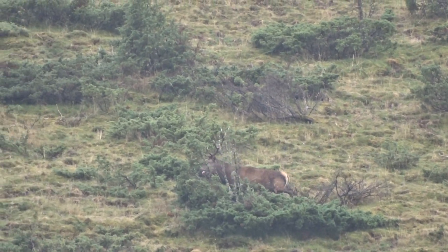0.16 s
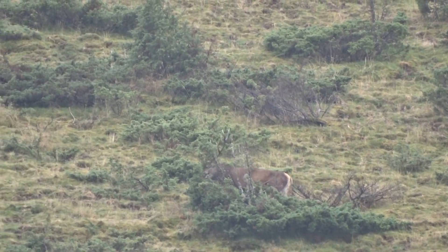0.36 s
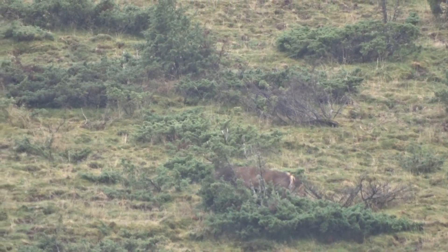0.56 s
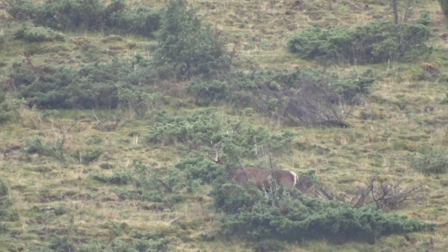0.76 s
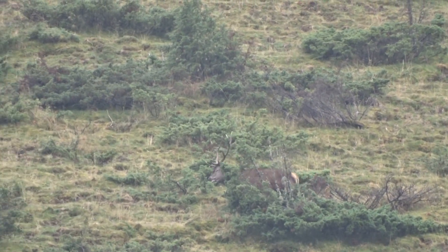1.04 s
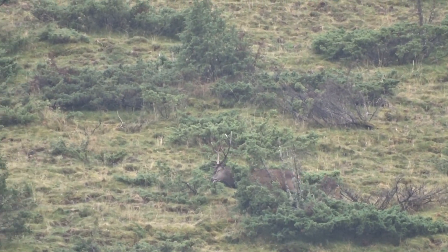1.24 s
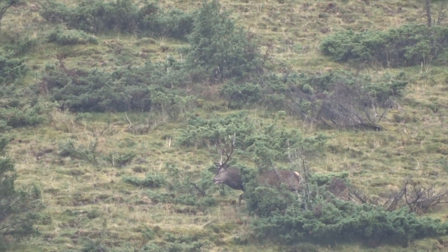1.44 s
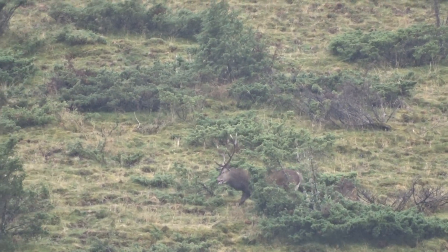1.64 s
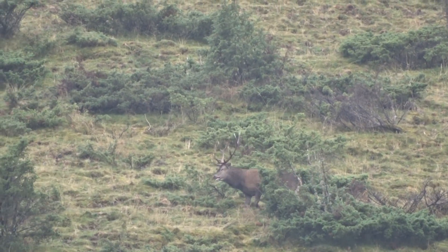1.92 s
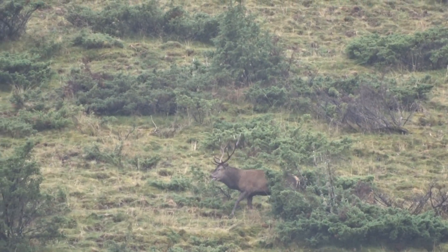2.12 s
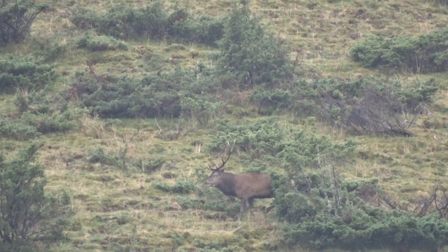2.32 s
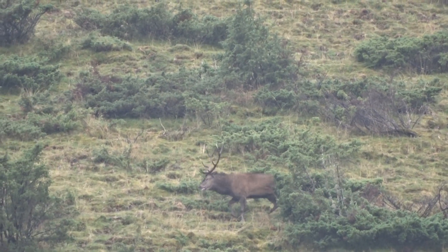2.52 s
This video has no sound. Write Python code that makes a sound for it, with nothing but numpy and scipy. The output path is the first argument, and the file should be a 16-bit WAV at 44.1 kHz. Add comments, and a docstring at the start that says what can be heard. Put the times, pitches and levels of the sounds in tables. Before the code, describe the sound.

Soft airy wind hiss throughout, with close dry scraping, small hollow knocks and thin metallic squeaks of handling

```python
"""Hiss of wind and microphone on a quiet hillside, at a camera panning after a distant, unheard stag.
The hiss is shaped stereo noise, its octave bands swelling together and flickering alone.
Close by, the turning camera mount scrapes (grainy noise) and rings faintly in fixed metallic modes
over a wavering low hum (a fluttering sine); one thin squeak falls in pitch near the end.
Soft hollow bumps, handling ticks and brief rustles are short rings and patches of noise in the hiss."""
import sys
import numpy as np
from scipy import signal
from scipy.fft import rfft, irfft
from scipy.io import wavfile
from scipy.ndimage import uniform_filter1d

SR = 44100
rng = np.random.default_rng(int(sys.argv[2]) if len(sys.argv) > 2 else 0)


def master_out(mix):
    """Clip the mix to full scale and print it as 16-bit PCM to the path in sys.argv[1]."""
    frames = np.transpose(np.atleast_2d(mix))
    ceiling = np.clip(frames, -1, 1)
    pcm = np.round(ceiling * 32767).astype(np.int16)
    wavfile.write(sys.argv[1], SR, pcm)


N = 118188
T = np.arange(N) / SR  # seconds
FREQS = np.maximum(np.arange(N // 2 + 1) * SR / N, 1)  # Hz
RING_FLICKER_DB = 0.5  # level wander of the mount's modes and of the squeak


def amp(db):
    """Decibels to gain."""
    return 10 ** (np.asarray(db) / 20)


def unit(x):
    """Scale to rms 1."""
    return x / np.sqrt(np.mean(x ** 2))


def over_time(table):
    """Join (s, value) rows by straight lines."""
    return np.interp(T, *np.array(table).T)


def over_pitch(table):
    """Join (Hz, value) rows on a log-frequency axis."""
    hz, value = np.array(table).T
    return np.interp(np.log(FREQS), np.log(hz), value)


def pan(db):
    """Left and right gains for a left-minus-right level difference."""
    return amp(np.array([[1], [-1]]) * db / 2)


def walk(rate):
    """Smooth random wander with a spread near 1, taking about `rate` new steps a second."""
    k = int(SR / rate)
    steps = np.repeat(rng.standard_normal(N // k + 2), k)
    smooth = uniform_filter1d(uniform_filter1d(steps, k), k)
    return np.sqrt(2) * smooth[:N]


def noise(gain):
    """Stereo noise of a given spectrum, partly alike in the two microphones, at rms 1."""
    # likeness of left and right: pitch_hz, correlation (0 to 1)
    likeness_rows = [(50, 0.26), (160, 0.75), (400, 0.25), (700, 0.31), (1400, 0.44), (3000, 0.75),
                     (5500, 0.87), (7300, 1), (8800, 0.63), (11000, 0.5), (14000, 0.99)]
    alike = np.clip(over_pitch(likeness_rows), 0, 1)
    mid, side = rfft(rng.standard_normal((2, N)))
    shared = mid * np.sqrt(1 + alike)
    opposed = np.array([[1], [-1]]) * side * np.sqrt(1 - alike)
    return unit(irfft((shared + opposed) * gain, N))


def resonance(hz, share):
    """Gain of a resonance whose width between half-gain points is a share of its pitch."""
    return 1 / (1 + ((FREQS / hz - hz / FREQS) / share) ** 2)


def envelope(start, length, attack, release):
    """Linear rise from start, exponential fall from start + length (all in seconds)."""
    rise = np.clip((T - start) / attack, 0, 1)
    return rise * np.exp(-np.maximum(T - start - length, 0) / release)


def ring(hz, waver_hz, flicker_db):
    """A sine at rms 1 whose pitch and level wander, as when friction keeps a mode ringing."""
    phase = 2 * np.pi * np.cumsum(hz + waver_hz * walk(45.16)) / SR
    return unit(np.sin(phase) * amp(flicker_db * walk(28.22)))


def wind():
    """Hiss of air and microphone whose octave bands swell together and flicker alone."""
    # colour of the hiss: pitch_hz, relative level_db (per Hz)
    air_rows = [(30, -23), (70, -22.5), (115, -16.5), (165, -9), (230, -9), (310, -11.5), (420, 2),
                (640, 2), (1000, 1.5), (1650, -4.5), (2400, 0.5), (3200, -1), (4500, -4.5), (5800, -5),
                (7300, -0.5), (9000, -8.5), (11500, -12), (15500, -15)]
    # stereo balance: pitch_hz, left_minus_right_db
    tilt_rows = [(100, 1.5), (380, 0), (700, 3), (1300, -0.8), (2400, -4), (5000, -2), (7500, 1),
                 (9000, -5), (14000, -1.2)]
    level_db, swell_db, flicker_db = -56, .35, .8
    spectrum = rfft(noise(amp(over_pitch(air_rows)) * pan(over_pitch(tilt_rows))))
    octave = np.clip(np.log2(FREQS / FREQS[-1]) + 8, 0, 8)
    swell = swell_db * walk(6.71)
    out = 0
    for k in range(9):
        # triangular bands that overlap and sum to one
        band = irfft(spectrum * np.maximum(1 - abs(octave - k), 0), N)
        out = out + band * amp(swell + flicker_db * walk(22.16))
    return amp(level_db) * out


def scrape():
    """Uneven dry friction of the turning mount; each half octave catches and slips by itself."""
    # course of the scraping: time_s, level_db
    scrape_rows = [(0, -64), (.2, -68.5), (.42, -64), (.57, -62), (.76, -65), (.88, -63.5), (.98, -69),
                   (1.11, -64), (1.18, -59.5), (1.28, -63.5), (1.45, -63), (1.72, -61), (1.9, -65.5),
                   (2.0, -63), (2.2, -77), (2.36, -66), (2.68, -64.5)]
    # colour of the scraping: pitch_hz, relative level_db (per Hz)
    colour_rows = [(200, -22.5), (600, -11), (1400, -0.5), (1650, -11), (2050, -3), (2280, 3.5),
                   (2500, -7.5), (3000, -4.5), (4200, -7), (6500, -4.5), (9000, -10), (15000, -20.5)]
    grain_db, grain_hz = 3.2, 70
    spectrum = rfft(noise(amp(over_pitch(colour_rows))))
    half_octave = np.clip(2 * np.log2(FREQS / 700), 0, 7)
    out = 0
    for k in range(8):
        band = irfft(spectrum * np.maximum(1 - abs(half_octave - k), 0), N)
        out = out + band * amp(grain_db * walk(grain_hz))
    return out * amp(over_time(scrape_rows)) * pan(-3)


def hum():
    """A faint low tone that flutters throughout and comes forward in short swells."""
    # swells added to the resting tone: start_s, length_s, level_db (before flutter)
    swell_rows = [(0.07, 0.079, -71), (.84, .075, -69), (1.062, 0.13, -72.5), (1.306, 0.052, -67),
                  (1.44, 0.059, -66.5), (1.516, 0.038, -64), (1.587, .13, -71), (1.755, 0.068, -69.5),
                  (2.005, 0.049, -69.5), (2.245, 0.061, -71.5), (2.6, .06, -78)]
    pitch_hz, waver_hz, flicker_db, flutter_db = 445, 7.45, 0.7, 2
    attack_s, release_s, rest_db = 0.028, 0.017, -77.5
    swells = 0
    for start, length, db in swell_rows:
        swells = swells + amp(db) * envelope(start, length, attack_s, release_s)
    tone = ring(pitch_hz, waver_hz, flicker_db)
    return (amp(rest_db) + swells) * tone * amp(flutter_db * walk(70))


def rustles():
    """Short dry brushes of handling, each a steep-sided patch of noise around one pitch."""
    # brushes: start_s, length_s, level_db, pitch_hz, half_width (share of pitch, before squaring)
    rustle_rows = [(.005, 0.022, -60.5, 2060, 0.44), (.105, 0.021, -59, 2230, 0.075),
                   (0.374, 0.017, -63, 10400, 0.37), (0.495, 0.026, -57.5, 7100, .2),
                   (0.546, 0.056, -60, 2100, 0.5), (0.681, 0.042, -64.5, 1440, 0.079),
                   (.69, 0.033, -65, 11500, 0.62), (0.62, 0.2, -64, 2350, 0.4),
                   (0.75, 0.026, -65, 1430, 0.1), (0.784, 0.028, -62, 2300, 0.073),
                   (0.919, 0.011, -62, 2870, .08), (1.165, 0.018, -60, 5000, 1),
                   (1.429, 0.0054, -56, 2830, .08), (1.39, 0.027, -63, 5500, 0.4),
                   (1.533, 0.062, -62, 2150, 0.25), (1.536, 0.012, -62.5, 13000, 0.48),
                   (1.749, .04, -64, 8600, 0.15), (1.91, .02, -61.5, 4500, 0.15),
                   (1.96, 0.021, -63, 4470, 0.58), (1.972, .02, -63.5, 5200, .06),
                   (2.079, 0.011, -60.5, 7500, 0.55), (2.116, 0.017, -67, 3650, 0.066),
                   (2.193, 0.023, -61, 2180, 0.14), (2.249, 0.019, -61, 2750, 0.27),
                   (2.461, 0.041, -62.5, 3460, 0.17), (2.47, 0.12, -62, 7200, .6)]
    attack_s, release_s = 0.0011, 0.013
    out = 0
    for start, length, db, hz, share in rustle_rows:
        patch = noise(resonance(hz, 2 * share) ** 2)  # squared for steeper sides
        out = out + amp(db) * patch * envelope(start, length, attack_s, release_s)
    return out * pan(-2.5)


def bumps():
    """Short hollow bumps, each a dying ring with a dull scuff around it."""
    # bumps: start_s, level_db, pitch_hz, decay_s
    bump_rows = [(0.045, -63, 920, 0.031), (.058, -57.5, 530, .008), (.096, -57, 870, 0.009),
                 (.182, -62, 850, .012), (0.192, -59, 560, 0.0083), (.225, -60, 630, 0.016),
                 (0.464, -54.5, 660, 0.013), (0.518, -51, 686, 0.0095), (0.991, -68, 750, .02),
                 (1.338, -57.5, 1420, 0.016), (1.431, -62, 690, 0.023), (1.45, -76, 162, 0.035),
                 (1.457, -56.5, 670, 0.013), (1.544, -59, 692, 0.008), (1.806, -68.5, 169, 0.018),
                 (1.859, -60.5, 753, 0.026), (2.391, -63.5, 583.6, 0.042), (2.424, -61, 580, 0.018),
                 (2.5, -71, 212.1, 0.023), (2.512, -61.5, 565, 0.019), (2.609, -73, 200.4, 0.02)]
    waver_share, attack_s = .035, 0.0041  # waver as a share of the pitch
    scuff_db, scuff_width = -4.5, 0.32  # level against the ring; width as a share of the pitch
    out = 0
    for start, db, hz, decay in bump_rows:
        pitch = hz * (1 + waver_share * walk(400))
        body = unit(np.sin(2 * np.pi * np.cumsum(pitch) / SR))
        scuff = amp(scuff_db) * noise(resonance(hz, scuff_width))
        out = out + amp(db) * unit(body + scuff) * envelope(start, attack_s, attack_s, decay)
    return out * pan(-0.5)


def ticks():
    """Tiny hard contacts of handling: a cycle or two of ringing and a faint noisy tail."""
    # ticks: start_s, level_db (amplitude before decay), pitch_hz, left_minus_right_db
    tick_rows = [(0.1697, -33, 10800, -6), (1.14, -38, 3800, 2), (2.468, -48, 4200, 4),
                 (2.617, -39.5, 11000, -5)]
    decay_cycles, tail_db, tail_s = 1.66, -21.5, 0.01  # tail level against the click
    out = 0
    for start, db, hz, side in tick_rows:
        age = np.maximum(T - start, 0)
        click = np.sin(2 * np.pi * hz * age) * np.exp(-age * hz / decay_cycles)
        tail = noise(resonance(hz, 0.6)) * (T > start) * np.exp(-age / tail_s)
        out = out + amp(db) * (click + amp(tail_db) * tail) * pan(side)
    return out


def mount():
    """Each rub drives the mount's modes near its favoured pitch; long rubs grip unevenly."""
    # rubs: start_s, length_s, drive level_db (before grip and mode gain), favoured pitch_hz,
    # spread_octaves, release_s
    rub_rows = [(0.21, 0.64, -68.5, 2660, 0.13, .03), (0.437, 1.54, -68, 1165, .1, .03),
                (0.532, 0.014, -55.5, 1797, 0.05, 0.036), (0.593, 0.04, -62, 4020, 0.09, .02),
                (.57, 0.12, -68.5, 1890, 0.06, .03), (0.677, 0.022, -63, 1830, 0.049, 0.022),
                (1.16, 0.29, -66, 1610, 0.23, 0.025), (1.15, 0.1, -67.5, 6000, 0.56, .02),
                (1.23, 0.15, -72.5, 2660, .1, .02), (1.384, 0.023, -57, 2052, 0.04, 0.017),
                (1.388, 0.014, -50.5, 5540, .04, .012), (1.39, 0.012, -55.5, 4000, 0.13, 0.039),
                (1.455, .025, -62.5, 2660, .1, .015), (1.488, .012, -58.5, 1860, .08, 0.013),
                (1.521, 0.028, -59.5, 2260, 0.26, 0.038), (1.56, 0.007, -66, 1845, .04, 0.0061),
                (1.573, 0.13, -67.5, 2320, .26, .05), (1.663, .02, -65, 2600, .1, 0.011),
                (1.706, 0.012, -57, 2660, 0.21, 0.016), (1.715, 0.022, -57.5, 4270, 0.17, .025),
                (1.77, 0.11, -67, 4100, 0.088, .02), (1.95, 0.014, -51.5, 2570, 0.25, 0.011),
                (1.96, 0.019, -58, 3700, 0.15, 0.021), (1.96, .015, -56, 6400, .15, .018),
                (1.97, 0.012, -52.5, 5030, 0.047, .022), (2.047, .012, -65, 5000, .045, .008),
                (1.978, 0.25, -68.5, 2270, 0.31, .03), (2.248, .012, -61, 2660, .1, 0.0088)]
    # metallic modes of the mount: pitch_hz
    mode_hz = [1165, 1845, 1988, 2661, 3564, 4020, 5059, 5222, 5507, 6285, 7198]
    # gain of each mode: level_db
    mode_db = [-9, -2.5, 1, 0.5, -1, -6, -4, -8, -8, -4.5, -15]
    # place of each mode: left_minus_right_db
    mode_pan_db = [-6.5, -0.5, -5, 0, -1, -1, -.5, 0, 2, -2, -1]
    attack_s, waver_hz = 0.013, 3.87
    grip_db, grip_hz, grip_onset_s = 2.3, 55, .08
    drives = []
    for start, length, db, _, _, release in rub_rows:
        # the unevenness grows in, so short rubs stay nearly smooth
        grip = grip_db * walk(grip_hz) * np.clip((T - start) / grip_onset_s, 0, 1)
        drives.append(amp(db + grip) * envelope(start, length, attack_s, release))
    drives = np.array(drives)
    favoured, spread = np.array(rub_rows)[:, 3:5].T
    out = 0
    for hz, db, side in zip(mode_hz, mode_db, mode_pan_db):
        nearness = np.exp(-.5 * (np.log2(hz / favoured) / spread) ** 2)
        drive = nearness @ drives
        out = out + amp(db) * drive * ring(hz, waver_hz, RING_FLICKER_DB) * pan(side)
    return out


def chirp():
    """A thin squeak: a wavering sine that swells as its pitch falls."""
    start_s, length_s, release_s, level_db = 2.11, 0.023, .005, -56
    pitch_hz, fall_hz_per_s, waver_hz = 3746, 7500, 49.4
    hz = pitch_hz - fall_hz_per_s * np.clip(T - start_s, 0, 2 * length_s)
    tone = ring(hz, waver_hz, RING_FLICKER_DB)
    return amp(level_db) * tone * envelope(start_s, length_s, length_s, release_s)


def scene():
    """Wind with the small noises of the camera and its mount."""
    return wind() + scrape() + hum() + rustles() + bumps() + ticks() + mount() + chirp()


def record(dry):
    """The recorder cuts the top steeply, with a tenth-order elliptic low-pass."""
    top_hz = 15750
    return signal.sosfilt(signal.ellip(10, .1, 70, top_hz, fs=SR, output="sos"), dry)


dry = scene()
out = record(dry)
master_out(out)
```